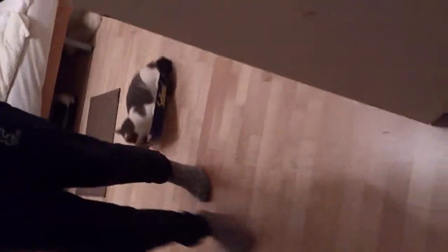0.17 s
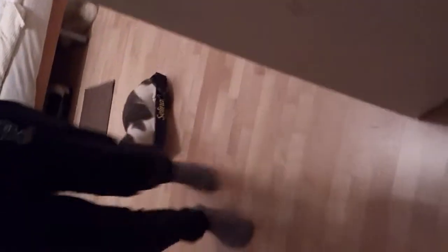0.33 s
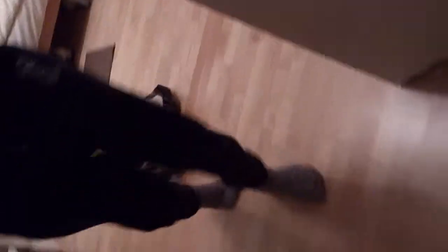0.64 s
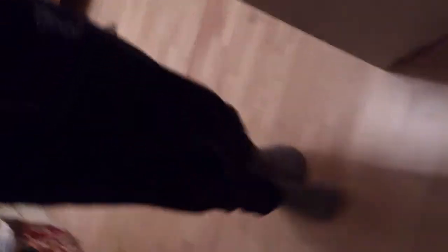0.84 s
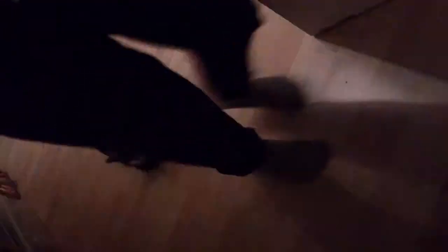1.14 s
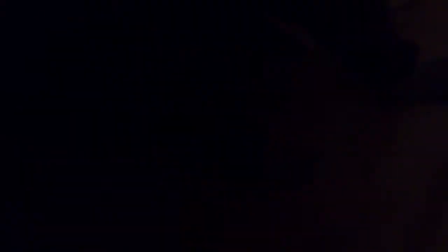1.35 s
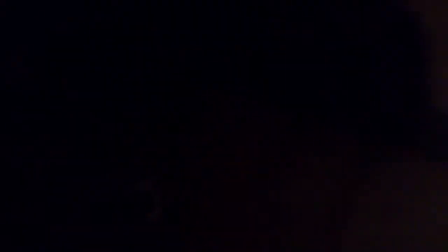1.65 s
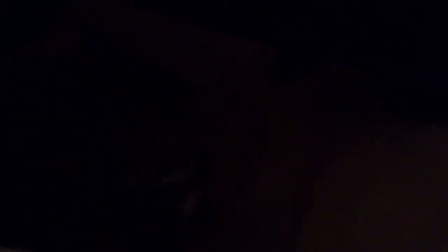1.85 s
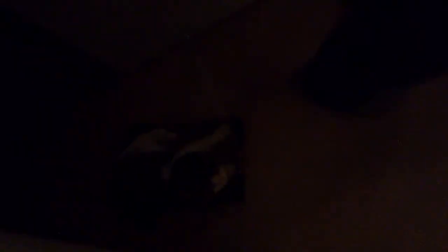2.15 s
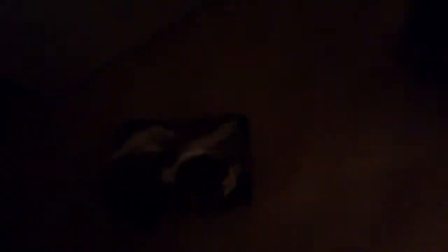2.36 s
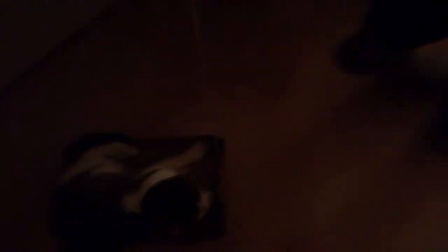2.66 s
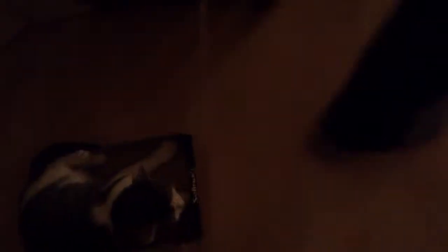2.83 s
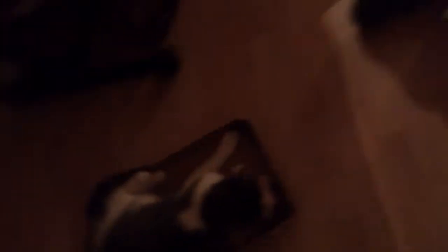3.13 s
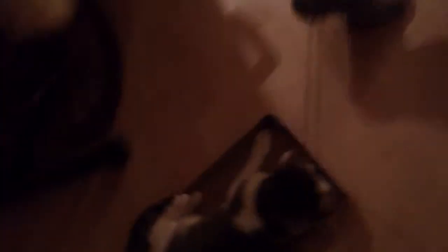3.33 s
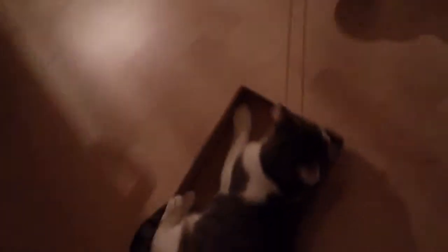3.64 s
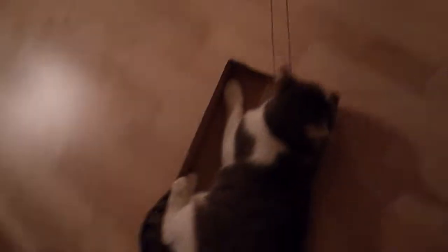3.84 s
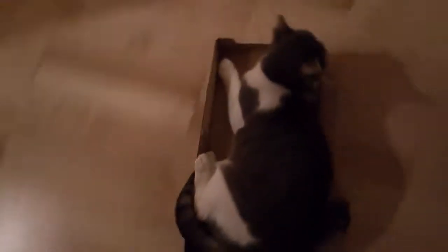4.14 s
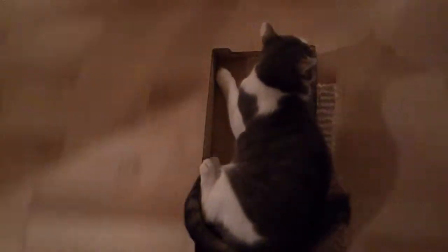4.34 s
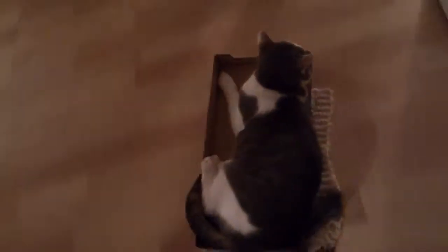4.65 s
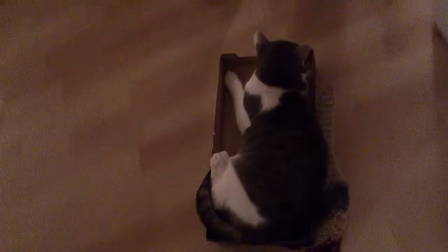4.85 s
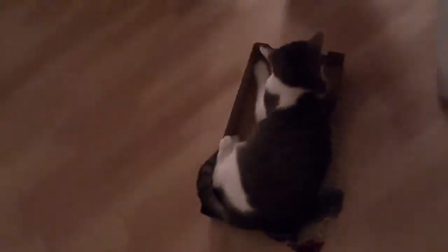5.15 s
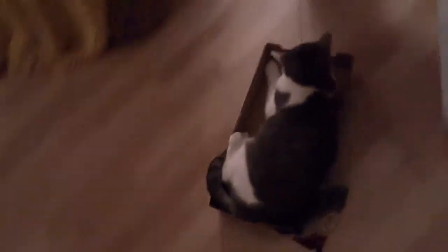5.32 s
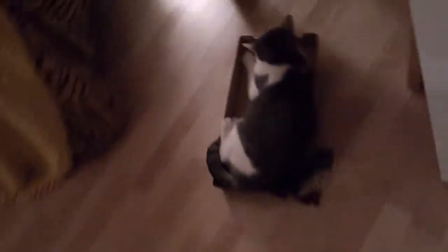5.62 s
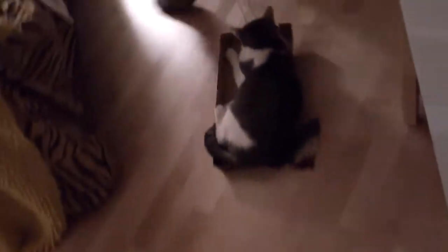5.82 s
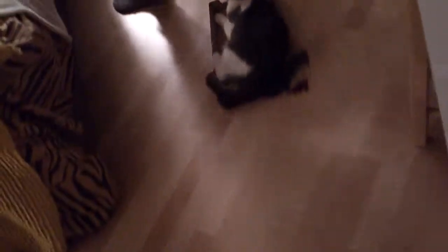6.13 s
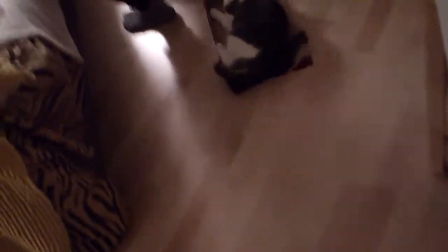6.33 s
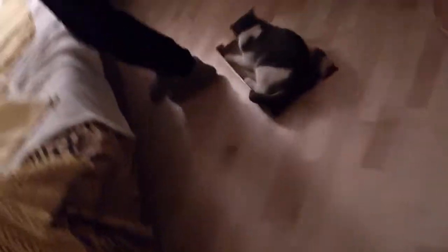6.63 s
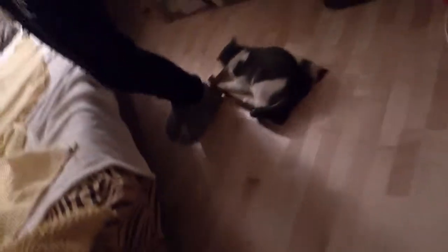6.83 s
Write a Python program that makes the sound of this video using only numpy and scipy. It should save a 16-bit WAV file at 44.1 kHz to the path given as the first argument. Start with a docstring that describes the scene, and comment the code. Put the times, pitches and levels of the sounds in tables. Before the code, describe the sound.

A cat's cardboard tray is pulled over a wooden floor, rasping and hissing in tugs while clothing swishes. Soft sock-footed heels thump and dull taps scatter. Just after one second a metal latch clatters and leaves a thin ring. Sharp close clicks snap near two and a half seconds and again near the end. Quiet room, one small microphone, faint steady noise.

```python
"""Indoors, one microphone in a quiet room: a cat rides in a cardboard tray, pulled on a string over a
wooden floor by someone in socks. From the start the tray rasps and hisses with each tug and clothes swish,
as friction grains through resonances. From 0.4 s heels thump (ringing boards) and dull taps are scattered
(noise through one resonance). At 1.2-1.4 s a latch clatters (rattled modes) and leaves metal singing.
Sharp clicks close by, snaps ringing short modes, come at 2.5 and 6.7 s; steady noise lies under it all."""
import sys
import numpy as np
from scipy import signal
from scipy.fft import rfft, irfft
from scipy.io import wavfile

SR = 44100
rng = np.random.default_rng(int(sys.argv[2]) if len(sys.argv) > 2 else 0)


def pcm_store(signal):
    """Save signal as 16-bit PCM."""
    levels = np.round(np.clip(np.atleast_2d(signal), -1, 1) * 32767)
    wavfile.write(sys.argv[1], SR, levels.astype(np.int16).T)


N = 307815  # samples, just under 7 s

# Tugs on the string, about one a stride with small jerks between:
# (top reached [s], rise [s per 10 dB], hold [s], fall [s per 10 dB],
#  tray rasp [dB], tray edge hiss [dB], cloth swish [dB], fine dust hiss [dB])
TUGS = [(0.059, 0.191, 0.022, 0.053, -48.2, -47.0, -46.0, -44.4),
        (0.215, 0.893, 0.45, 0.159, -63.7, -56.1, -58.6, -53.9),
        (0.98, 0.11, 0.025, 0.103, -58.7, -55.5, -59.6, -55), (1.085, 0.04, 0.01, 0.04, -70, -64, -63, -59),
        (1.3, 0.13, 0.085, 0.115, -60, -54.5, -56, -51.5),
        (1.581, 0.332, 0.09, 0.033, -63.6, -55.7, -60.4, -54.2),
        (1.753, 0.075, 0.013, 0.1, -50.9, -48.3, -50.2, -46.6),
        (1.865, 0.05, 0.01, 0.06, -62, -55, -57, -50.5),
        (2.164, 0.188, 0.009, 0.063, -55.7, -51.4, -59.6, -53.0),
        (2.401, 0.113, 0.184, 0.285, -64.8, -54.0, -75.0, -61.3),
        (2.522, 0.08, 0.016, 0.063, -54.8, -51.5, -58.9, -50.8),
        (2.657, 0.056, 0.0, 0.048, -75.0, -70.2, -75.0, -54.8),
        (2.824, 0.109, 0.162, 0.264, -75.0, -50.3, -60.5, -53.0),
        (3.24, 0.149, 0.094, 0.09, -62.0, -50.7, -53.6, -53.4),
        (3.637, 0.098, 0.078, 0.193, -61.6, -53.0, -50.8, -54.7),
        (3.953, 0.142, 0.131, 0.088, -59.0, -53.6, -49.1, -49.4),
        (4.42, 0.132, 0.01, 0.103, -66.2, -54.2, -49.7, -48.7),
        (4.834, 0.302, 0.005, 0.371, -57, -51.9, -50.2, -47.5),
        (5.016, 0.21, 0.383, 0.108, -49.8, -53.4, -55.0, -51.5),
        (5.528, 0.417, 0.39, 0.126, -63.3, -59.5, -55.6, -49.0),
        (6.784, 0.491, 0.16, 0.3, -75.0, -56.5, -56.4, -51.1)]
# The tray sliding on between tugs: (time [s], rumble [dB], rasp [dB])
DRAG = [(0.0, -62.0, -74.0), (0.4, -64.2, -66.0), (0.8, -67.9, -63.0), (1.15, -70.3, -67.5),
        (1.6, -61.7, -71.1), (2.3, -68.1, -60.0), (2.9, -55.7, -64.2), (3.4, -59.3, -59.6),
        (4.0, -60.6, -56.1), (4.55, -59.6, -54.0), (4.8, -58.5, -59.3), (5.2, -57.4, -70.0),
        (5.8, -59.5, -59.1), (6.3, -63.1, -57.2), (6.98, -69.2, -62.9)]
# While the string hangs slack: (edge hiss [dB], swish [dB], dust hiss [dB])
SLACK_LEVELS = (-67, -86, -66)


def rub_levels(t):
    """Level in dB of each rubbing layer: the steady drag plus, above the rumble, every tug's swell and fall."""
    drag_s, rumble_db, rasp_db = np.transpose(DRAG)
    power = [from_db(np.interp(t, drag_s, rasp_db)) ** 2]
    power += [from_db(db) ** 2 for db in SLACK_LEVELS]
    for top_s, rise_s, hold_s, fall_s, *tops_db in TUGS:
        before_top = (top_s - t) / rise_s
        after_hold = (t - top_s - hold_s) / fall_s
        below_db = 10 * np.maximum(0, np.maximum(before_top, after_hold))
        power = [p + from_db(db - below_db) ** 2 for p, db in zip(power, tops_db)]
    return [np.interp(t, drag_s, rumble_db)] + [10 * np.log10(p) for p in power]


# Resonance of rumble, rasp, edge hiss, swish, dust hiss: (centre [Hz], width [Hz])
RUB_RESONANCES = [(1500, 2150), (2550, 1560), (4900, 1800), (7100, 3600), (10500, 1900)]
# The tray's changing angle shifts its colour:
# (time [s], pitch of rumble and rasp [factor], pitch of dust hiss [factor])
TRAY_GLIDE = [(0, 1.18, 0.95), (.25, 0.97, .98), (2.7, 0.88, 0.97), (2.9, 0.95, 0.94), (3.4, 0.97, 0.99),
              (4.7, 0.96, 1.02), (4.85, 1.15, 0.99), (5.15, 0.84, 1), (5.45, .9, 1.03), (5.9, 0.86, 0.99),
              (6.98, 1.06, 0.99)]
GRAINS_PER_S, GRAIN_SPREAD_DB = 20000, 0.53
OWN_FLICKER_DB, SHARED_FLICKER_DB = 0.55, 0.35


def rubbing():
    """Dense grains of friction through the broad resonance of each rubbing surface."""
    t = np.arange(N) / SR
    turn_s, low, high = np.transpose(TRAY_GLIDE)
    low, high = np.interp(t, turn_s, low), np.interp(t, turn_s, high)
    glides = [low, low, 1, 1, high]
    levels = [np.interp(t, t[::64], db) for db in rub_levels(t[::64])]
    out = np.zeros(N)
    together = drift(8.3)  # a snag in the pull shakes all layers at once
    for db, factor, (hz, width_hz) in zip(levels, glides, RUB_RESONANCES):
        sizes = from_db(GRAIN_SPREAD_DB * rng.exponential(1, N)) * rng.standard_normal(N)
        grains = sizes * (rng.random(N) < GRAINS_PER_S / SR)
        centre = hz * factor * np.ones(N)
        body = gliding_resonance(grains, centre, width_hz)
        body = gliding_resonance(body, centre, 1.56 * width_hz)
        level_db = db + SHARED_FLICKER_DB * together + OWN_FLICKER_DB * drift(11.3)
        out += from_db(level_db) * rms_one(body)
    return out


# Heels on the boards: (time [s], peak level [dB], board pitch [Hz], t60 [s])
HEELS = [(.369, -47, 140, .08), (.965, -62, 80, .15), (1.385, -46, 66, 0.14), (2.495, -57, 65, 0.19),
         (2.689, -49, 91, 0.091), (2.707, -44.5, 61.7, 0.26), (2.801, -49, 72, 0.09), (2.851, -50, 65, .11),
         (2.906, -47, 62, .11), (3.655, -55, 72, .2), (4.092, -56, 62, .18), (4.415, -54, 78, .16),
         (4.46, -58, 55.3, 0.23), (4.825, -57, 70, .25), (5.212, -58, 95, 0.092), (5.258, -56.5, 64, 0.25),
         (5.59, -60, 68, .3)]


def heels():
    """A soft push of 8 ms sets the boards swinging."""
    out, push = np.zeros(N), np.hanning(int(0.008 * SR))
    for s, db, hz, t60 in HEELS:
        boards = ring(np.pad(push, (0, int(t60 * SR))), hz, t60)
        add(out, s, db, boards)
    return out


# Latch contacts, with a level for the modes of each band, to which the mode's own level is added:
# (time [s], under 1.2 kHz [dB], to 2.3 kHz [dB], to 4 kHz [dB], above [dB], rattle t60 [s])
LATCH_HITS = [(1.177, -50, -54, -56, -58, .02), (1.1805, -37, -38.5, -43, -44, 0.021),
              (1.187, -46.5, -57, -42.5, -41, 0.065), (1.2227, -43, -37.5, -47, -47, 0.028),
              (1.2285, -43.5, -55, -44, -60, 0.029), (1.3003, -55, -44, -41.5, -41.5, 0.018),
              (1.305, -44, -42, -40.5, -44.5, 0.042), (1.3425, -41, -44, -53, -46, 0.035),
              (1.348, -44.5, -42, -57, -48, 0.024), (1.37, -51, -64, -62, -56, 0.02)]
# Modes of the latch: (pitch [Hz], level against its band [dB], t60 [s])
LATCH_MODES = [(360, -11.5, .03), (512, -3.5, 0.11), (536, -3, 0.072), (635, -6, 0.047), (700, 2, 0.035),
               (860, 3.5, 0.04), (890, -3.5, 0.037), (1050, -10, 0.05), (1180, -6.5, 0.036),
               (1436, 3.5, 0.024), (1380, 0, 0.02), (1615, 1, 0.022), (1700, -4, .03), (1890, 0, 0.017),
               (2080, -5, 0.025), (2330, 1, 0.027), (2650, 0, 0.022), (2880, 3.5, 0.022),
               (3040, 0.5, 0.021), (3370, -2.5, 0.015), (4900, 6, 0.002), (7000, -1, 0.0023),
               (9130, 5.5, .006), (10560, 6, 0.0025)]


def latch():
    """Each contact is a short rattle that shakes every mode in its own way; small parts radiate no bass."""
    out = np.zeros(N)
    for hz, mode_db, t60 in LATCH_MODES:
        band = np.searchsorted([1200, 2300, 4000], hz)
        for s, *bands_db, rattle_t60 in LATCH_HITS:
            rattle = np.pad(dying_noise(rattle_t60), (0, int(t60 * SR)))
            add(out, s, bands_db[band] + mode_db, ring(rattle, hz, t60))
    return high_pass(out, 220)


# Metal left singing by the latch: (pitch [Hz], peak level [dB], t60 [s])
SINGING_MODES = [(570, -60, 2.3), (651, -58, .7)]
SINGING_START_S = 1.345


def singing():
    """Two thin modes, struck once, outlast the clatter."""
    out = np.zeros(N)
    for hz, db, t60 in SINGING_MODES:
        strike = np.r_[1., np.zeros(int(t60 * SR))]
        add(out, SINGING_START_S, db, ring(strike, hz, t60))
    return out


# Sharp clicks close by:
# (time [s], peak level [dB], tilt [dB per octave], third mode against its usual level [dB])
CLICKS = [(2.5362, -24, -3, -8), (6.7279, -15.7, 0, 0)]
# Modes of a click, before the tilt: (pitch [Hz], level [dB], t60 [s])
CLICK_MODES = [(1900, 6, .0025), (4800, 11, .002), (6300, 8.5, .0036), (9720, 13, .002), (11600, 10, .002),
               (14600, -3, .002)]
REBOUND_S, REBOUND_SHARE = 0.00017, 0.45


def clicks():
    """A hard snap and its rebound ring a few very short modes, neighbours in opposite sense."""
    out, snap = np.zeros(N), np.zeros(SR // 100)
    snap[0], snap[round(REBOUND_S * SR)] = 1, REBOUND_SHARE
    for s, db, tilt_db, third_db in CLICKS:
        click = np.zeros(len(snap))
        for k, (hz, mode_db, t60) in enumerate(CLICK_MODES):
            level_db = mode_db + tilt_db * np.log2(hz / 5000) + third_db * (k == 2)
            click += (-1) ** k * from_db(level_db) * ring(snap, hz, t60)
        add(out, s, db, high_pass(click, 400))
    return out


# Dull taps on wood or card: (time [s], peak level [dB], centre [Hz], width [Hz], t60 [s])
TAPS = [(0.372, -41.5, 1120, 260, 0.058), (.372, -42.5, 540, 170, 0.041), (.374, -46, 200, 120, 0.042),
        (.561, -57, 1063, 70, .04), (.776, -54, 180, 150, 0.045), (3.279, -42, 870, 130, 0.15),
        (3.942, -54, 199, 250, 0.052), (4.703, -53, 190, 160, .05), (4.74, -54.5, 282, 120, .05),
        (4.891, -56, 160, 150, .04), (5.153, -48, 350, 500, .025), (5.329, -42, 1350, 250, .03)]


def taps():
    """A first knock and dying chatter pass twice through a resonance, wider the second time."""
    out = np.zeros(N)
    for s, db, hz, width_hz, t60 in TAPS:
        force = np.pad(dying_noise(t60), (0, SR // 50))
        force[0] = np.sqrt(np.sum(force ** 2))  # the knock holds as much energy as the chatter
        body = resonance(force, hz, width_hz)
        add(out, s, db, resonance(body, hz, 2.8 * width_hz))
    return out


ROOM_T60_S, ROOM_DB = 0.23, -13.5


def room(x):
    """Diffuse, dulled echoes that begin after 5 ms."""
    echoes = np.r_[np.zeros(int(0.005 * SR)), dying_noise(ROOM_T60_S)]
    tail = signal.lfilter([1], [1, -0.6], echoes)
    return from_db(ROOM_DB) * signal.fftconvolve(x, tail / np.sqrt(np.sum(tail ** 2)))[:N]


# Colour of the steady noise: (frequency [Hz], relative level [dB per Hz])
ROOM_TONE = [(18, -53), (30, -5), (98, -3), (437, -11), (632, -13), (1760, -8), (2540, -7), (3400, -21.5),
             (4080, -23), (5740, -20), (8520, -31), (10800, -15), (13000, -27), (16000, -22.5)]
ROOM_TONE_DB = -61  # rms


def room_tone():
    """Steady noise of the house and the microphone."""
    hz = np.fft.rfftfreq(N, 1 / SR) + 1  # 1 Hz up, so that the logarithm exists
    at_hz, db = np.transpose(ROOM_TONE)
    colour = from_db(np.interp(np.log(hz), np.log(at_hz), db))
    noise = irfft(rfft(rng.standard_normal(N)) * colour, N)
    return from_db(ROOM_TONE_DB) * rms_one(noise)


def from_db(db):
    """Decibels to gain."""
    return 10 ** (np.asarray(db) / 20)


def rms_one(x):
    """Scale to unit rms."""
    return x / np.sqrt(np.mean(x ** 2) + 1e-20)


def drift(rate_hz):
    """Slow chance: noise through a double one-pole low-pass, unit rms, made at every 40th sample."""
    r = np.exp(-80 * np.pi * rate_hz / SR)
    noise = rng.standard_normal(N // 40 + 2002)
    slow = signal.lfilter([1], [1, -2 * r, r * r], noise)[2000:]  # skip the filter's start
    return np.interp(np.arange(N) / 40, np.arange(len(slow)), rms_one(slow))


def resonance(x, hz, width_hz):
    """Band of gain about 1 at its centre."""
    r = np.exp(-np.pi * width_hz / SR)
    feedback = [1, -2 * r * np.cos(2 * np.pi * hz / SR), r * r]
    return signal.lfilter((1 - r * r) / 2 * np.array([1, 0, -1]), feedback, x)


def gliding_resonance(x, hz, width_hz):
    """A resonance whose centre follows a curve, block by block."""
    out, state, r = np.zeros(N), np.zeros(2), np.exp(-np.pi * width_hz / SR)
    for i in range(0, N, 256):
        feedback = [1, -2 * r * np.cos(2 * np.pi * hz[i] / SR), r * r]
        out[i:i + 256], state = signal.lfilter([1, 0, -1], feedback, x[i:i + 256], zi=state)
    return out


def ring(x, hz, t60):
    """A unit click sets a sine ringing, which starts near height 1 and falls 60 dB in t60 seconds."""
    r, w = from_db(-60 / (t60 * SR)), 2 * np.pi * hz / SR
    return signal.lfilter([0, np.sin(w)], [1, -2 * r * np.cos(w), r * r], x + 1e-18)


def dying_noise(t60):
    """Noise that starts at once and falls 60 dB in t60 seconds."""
    t = np.arange(int(t60 * SR)) / SR
    return rng.standard_normal(len(t)) * from_db(-60 * t / t60)


def high_pass(x, hz):
    """Nothing much below hz."""
    return signal.sosfilt(signal.butter(3, hz, "high", fs=SR, output="sos"), x)


def add(out, s, db, sound):
    """Mix a sound in at a time with a given peak level."""
    at = round(s * SR)
    sound = sound[:N - at]
    out[at:at + len(sound)] += from_db(db) * sound / np.max(np.abs(sound))


def scene():
    """All sources reach a single microphone, heard alike on both channels; only latch and taps echo."""
    blows = latch() + taps()
    mono = rubbing() + heels() + blows + room(blows) + singing() + clicks() + room_tone()
    return np.array([mono, mono])


# Dip below the microphone's port resonance: (centre [Hz], width [Hz], depth [share])
MIC_DIP = (8920, 480, 0.25)
MIC_LOW_CUT_HZ, TOP_CUT_HZ = 46.6, 16000


def record(dry):
    """The small microphone loses the deep bass and dips under its port resonance; the top is cut steeply."""
    hz, width_hz, share = MIC_DIP
    dip = share * np.array([resonance(channel, hz, width_hz) for channel in dry])
    heard = high_pass(dry - dip, MIC_LOW_CUT_HZ)
    return signal.sosfilt(signal.cheby2(16, 60, TOP_CUT_HZ, fs=SR, output="sos"), heard)


dry = scene()
out = record(dry)
pcm_store(out)
```